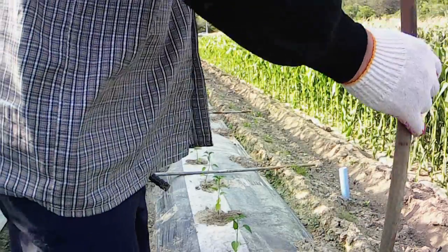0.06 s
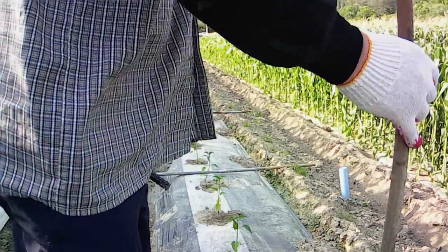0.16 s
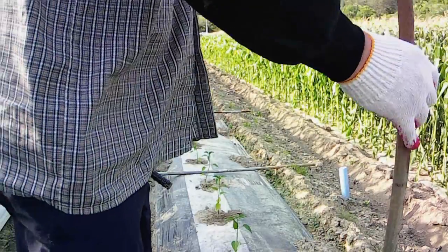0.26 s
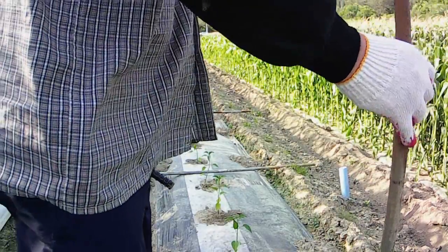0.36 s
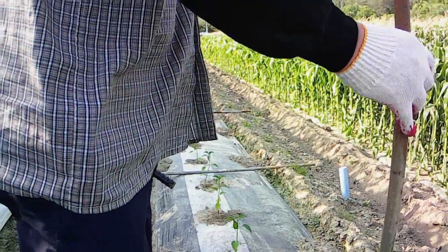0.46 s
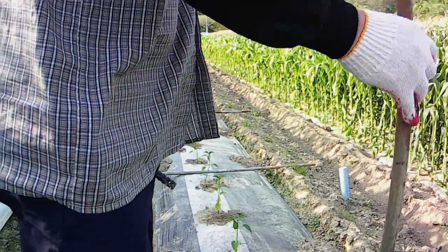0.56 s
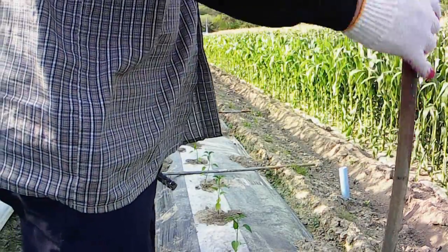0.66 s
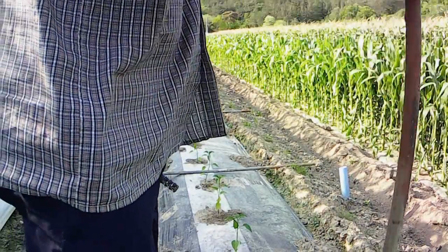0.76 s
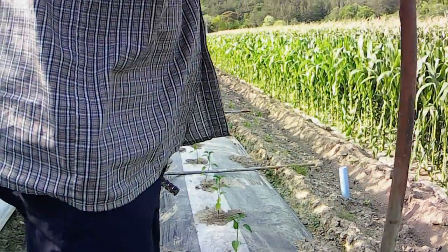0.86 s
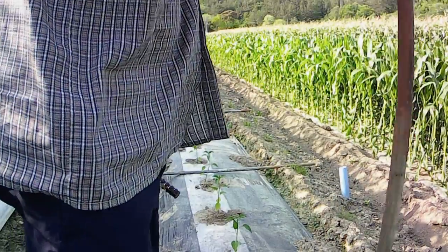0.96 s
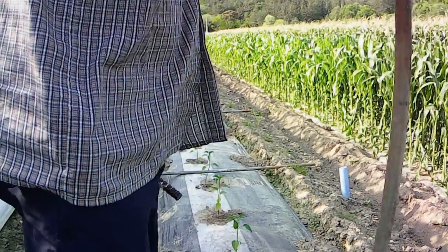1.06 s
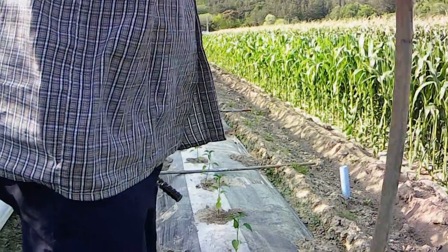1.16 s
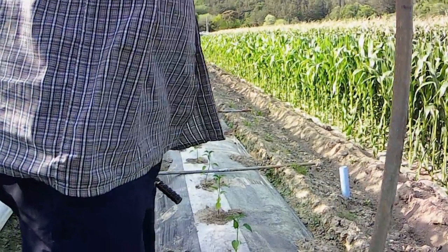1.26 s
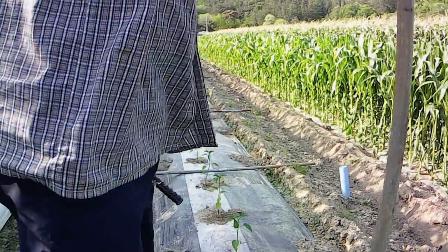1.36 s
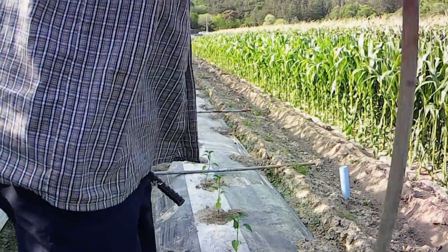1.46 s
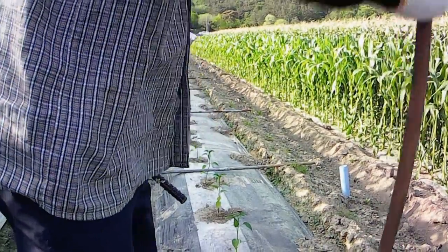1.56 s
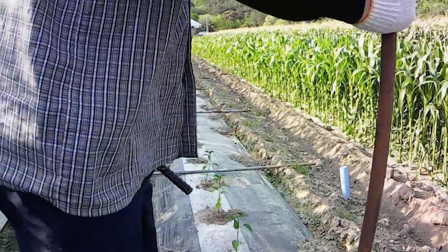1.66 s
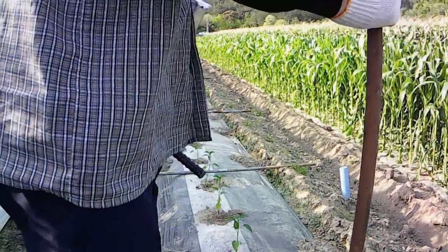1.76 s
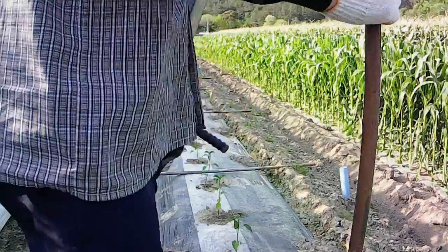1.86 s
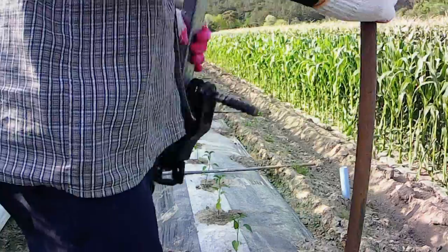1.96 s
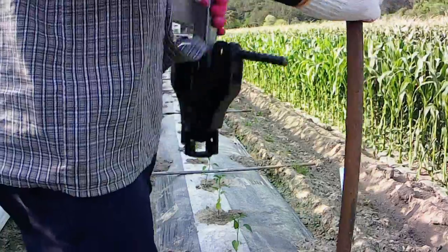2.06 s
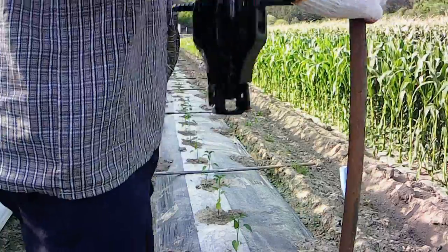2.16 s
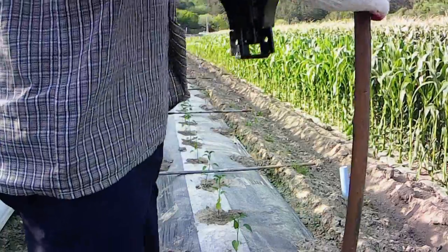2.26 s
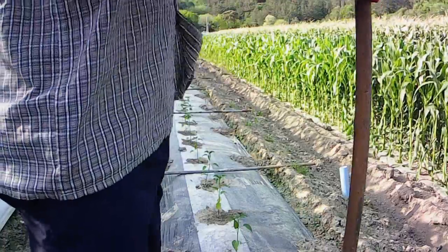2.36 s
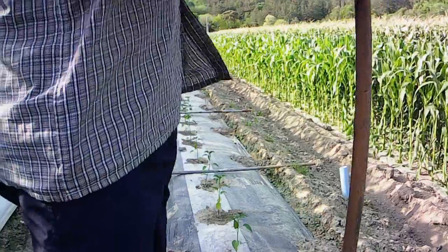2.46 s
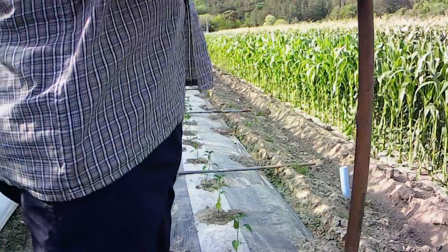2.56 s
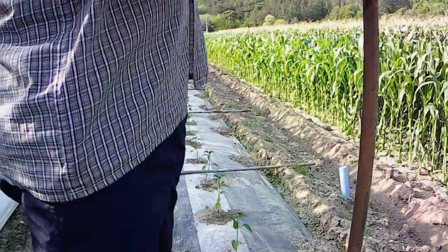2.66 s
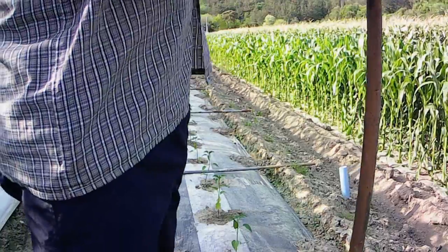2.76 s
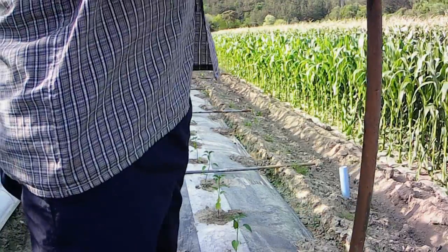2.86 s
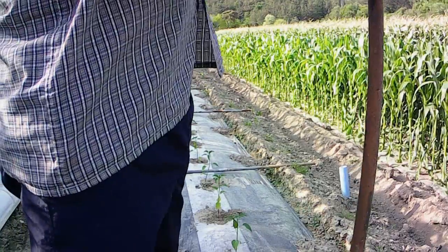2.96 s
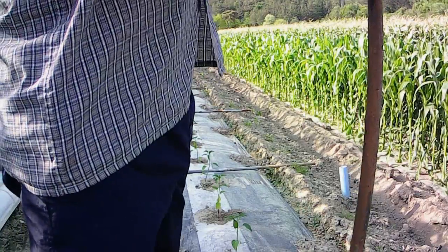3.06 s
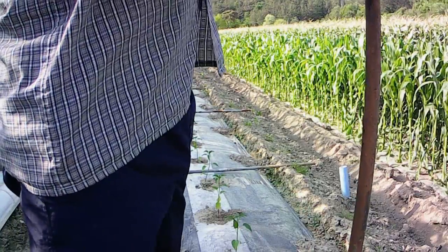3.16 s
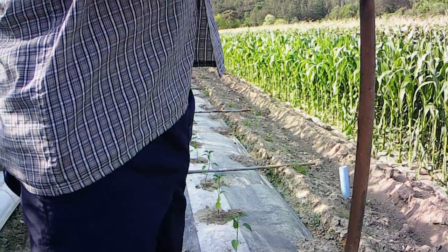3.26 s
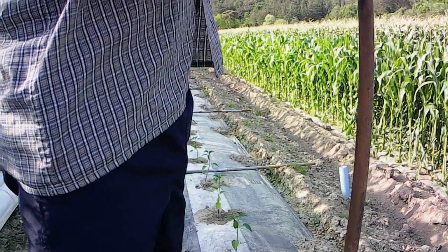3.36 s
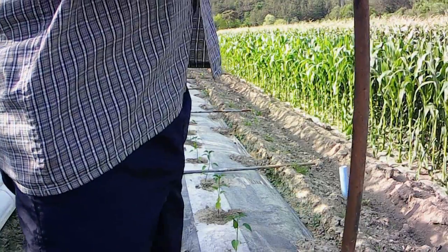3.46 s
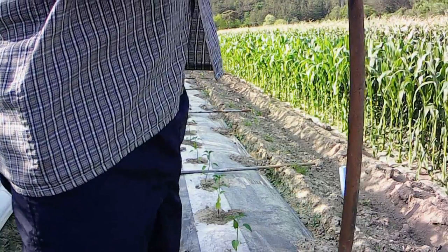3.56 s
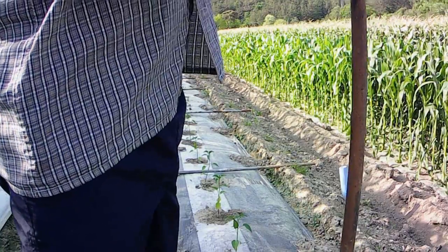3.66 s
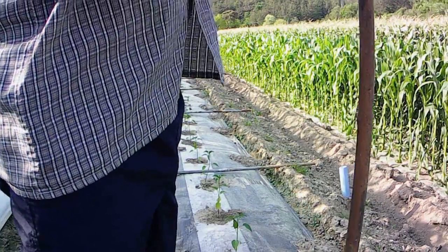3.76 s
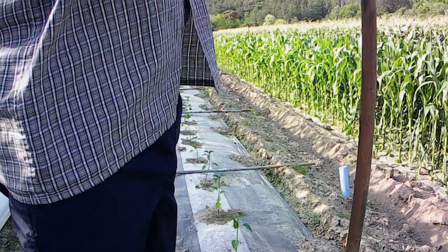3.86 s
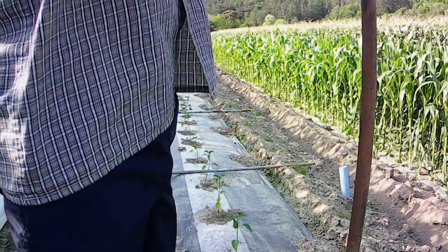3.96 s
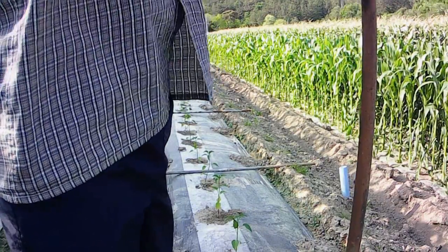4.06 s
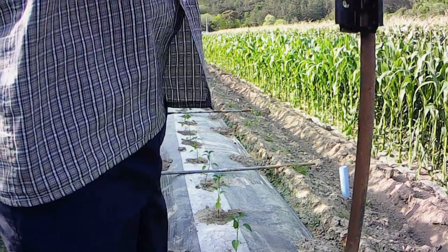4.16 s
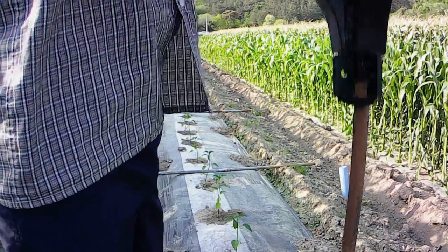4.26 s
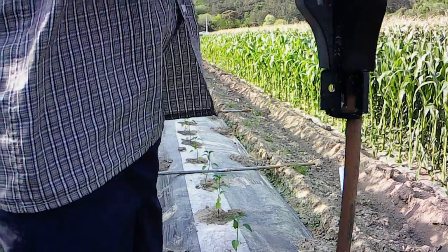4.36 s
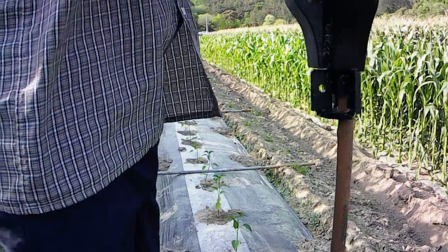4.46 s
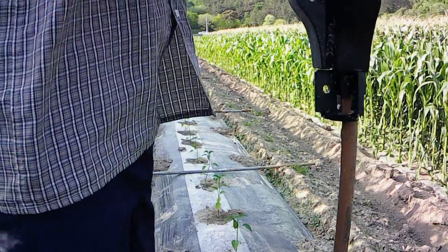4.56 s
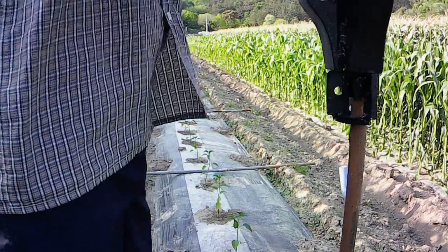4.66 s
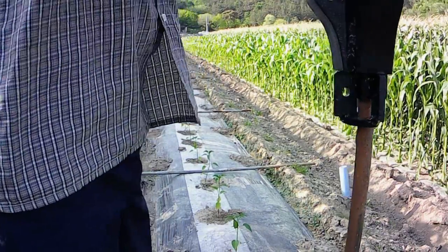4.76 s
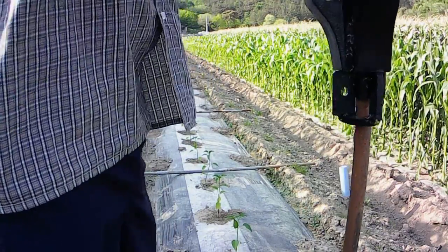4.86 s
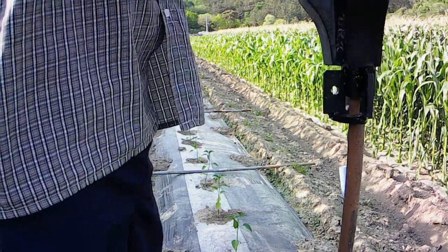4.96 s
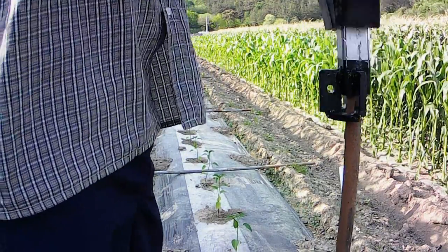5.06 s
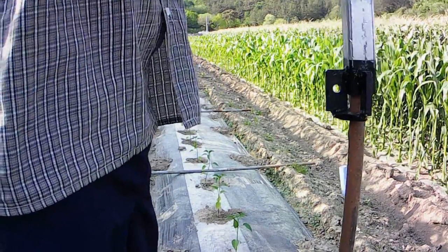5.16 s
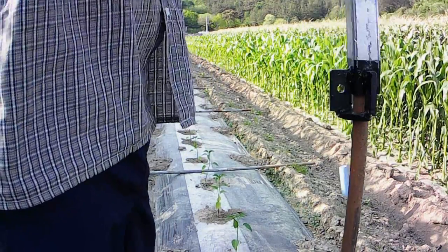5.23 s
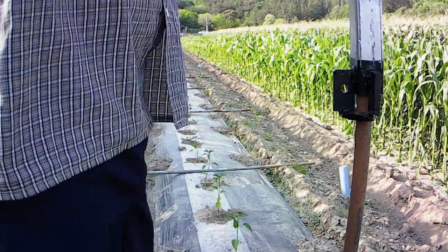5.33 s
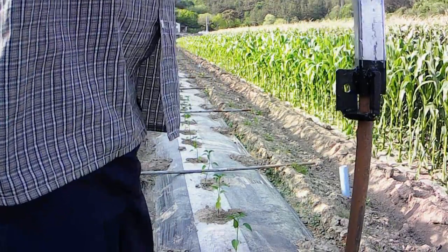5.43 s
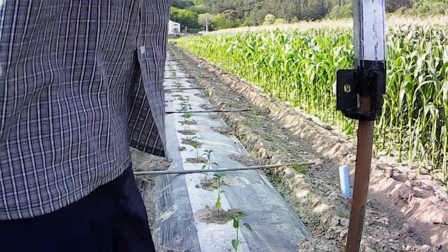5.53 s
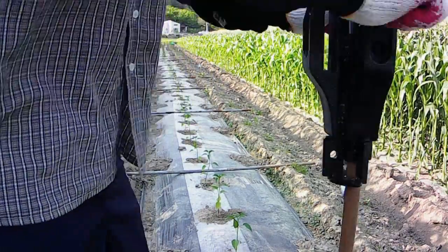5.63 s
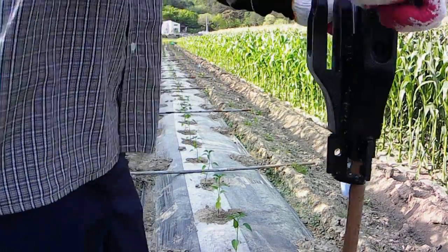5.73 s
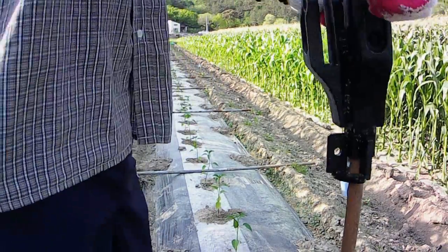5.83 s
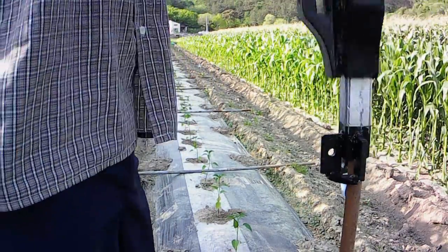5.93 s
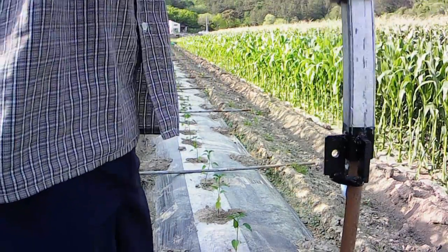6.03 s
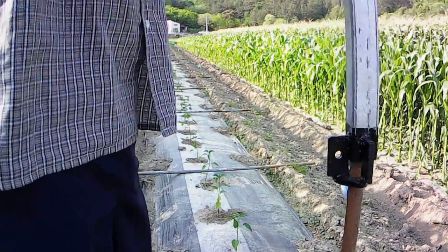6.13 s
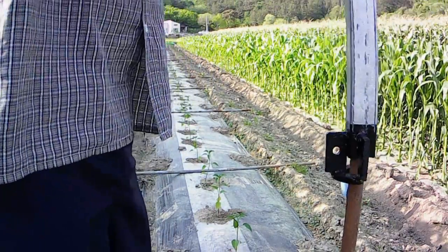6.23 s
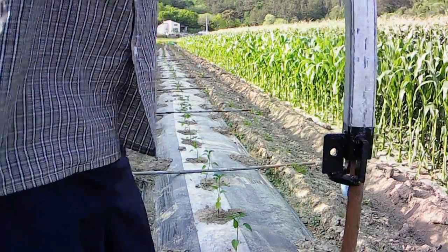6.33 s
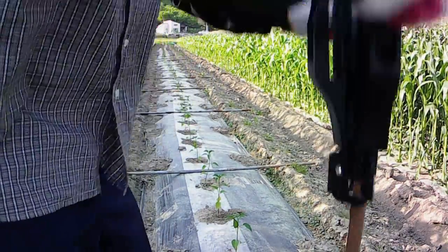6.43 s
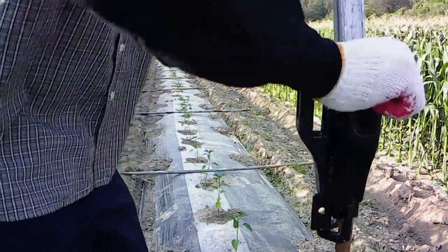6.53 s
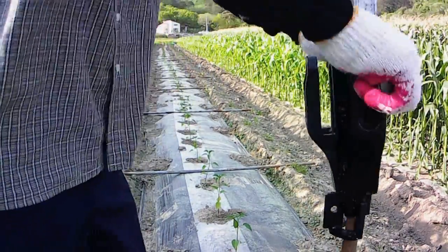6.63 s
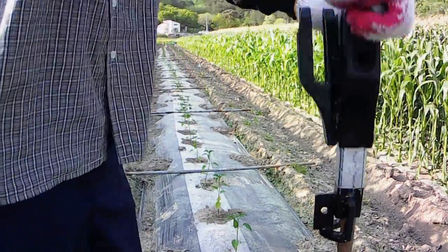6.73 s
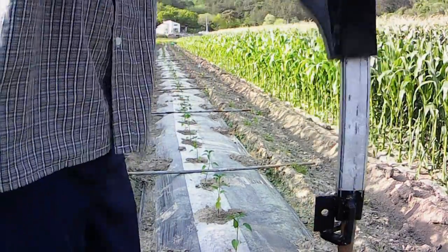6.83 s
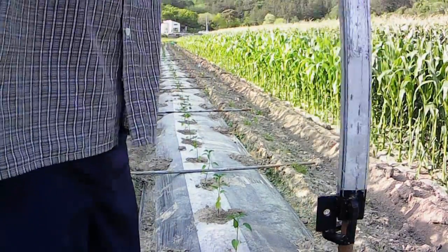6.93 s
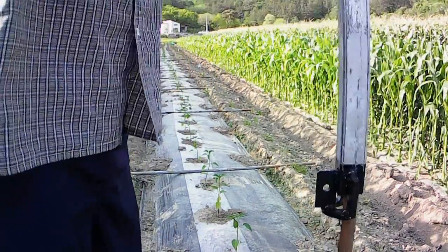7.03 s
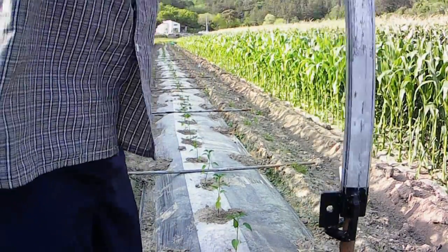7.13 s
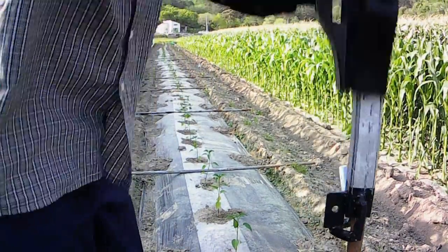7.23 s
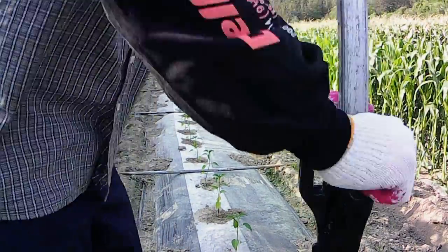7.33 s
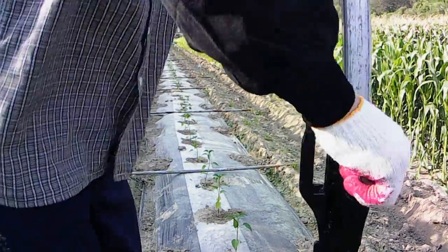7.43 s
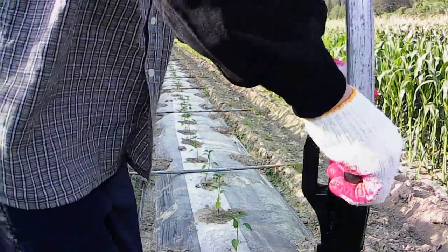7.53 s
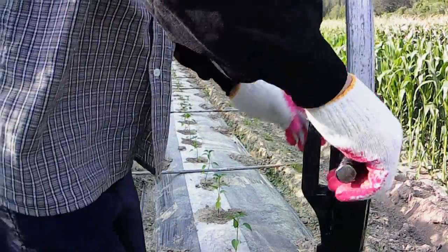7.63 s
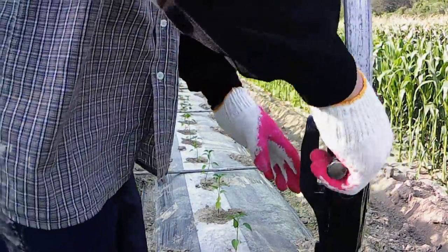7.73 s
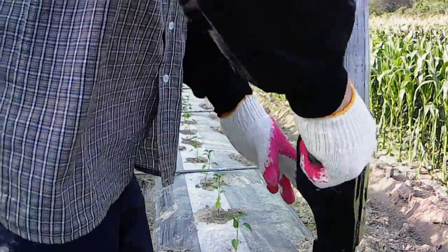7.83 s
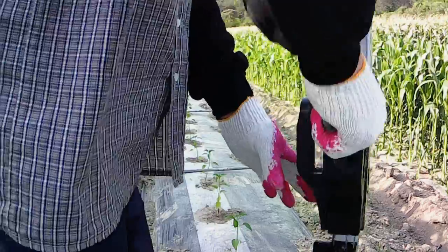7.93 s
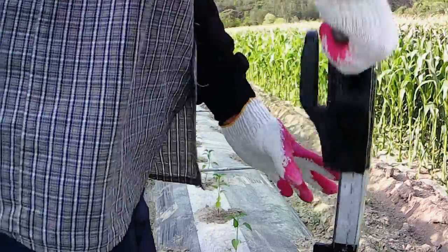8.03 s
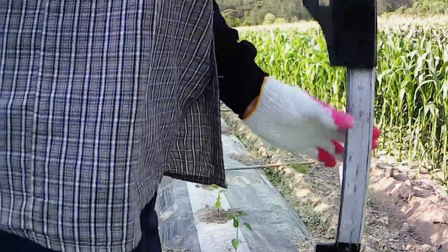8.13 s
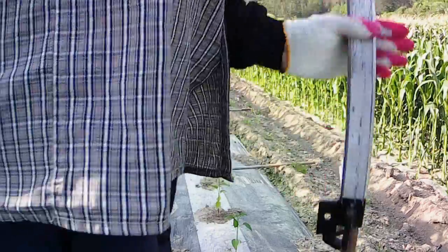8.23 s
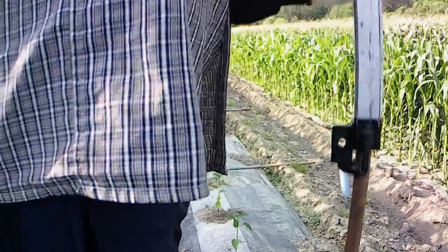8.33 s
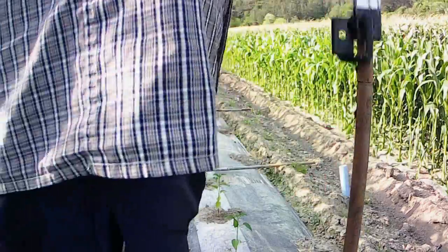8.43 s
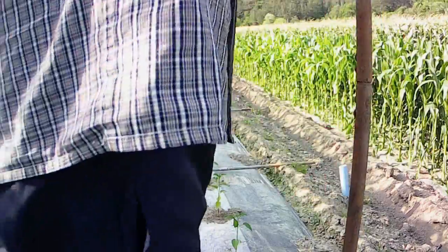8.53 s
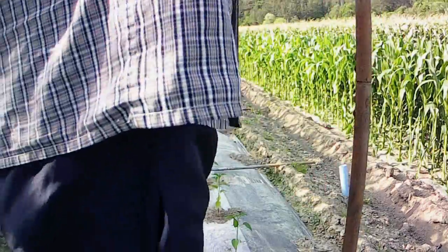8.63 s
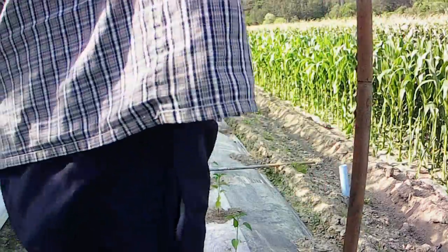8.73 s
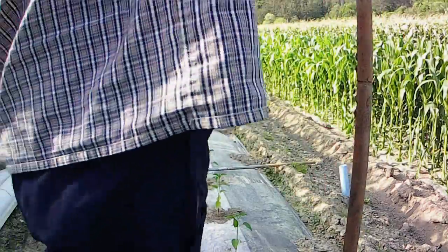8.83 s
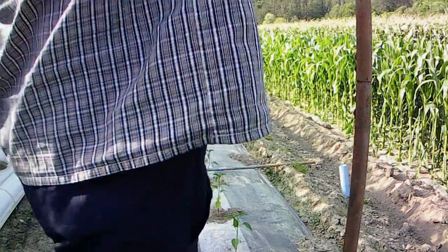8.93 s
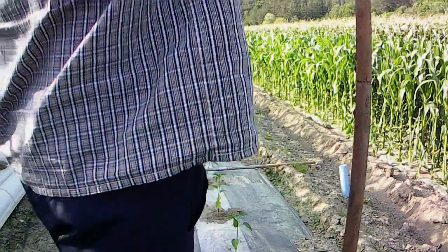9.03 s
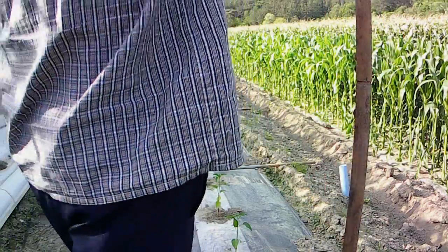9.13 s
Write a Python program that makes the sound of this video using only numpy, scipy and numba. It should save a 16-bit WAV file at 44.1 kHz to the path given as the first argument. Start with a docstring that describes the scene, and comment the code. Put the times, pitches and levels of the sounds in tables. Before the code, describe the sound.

A heavy steel sliding hammer clatters onto a pipe outdoors, slams three times with harsh overloaded clanks, then scrapes loose and stops.

```python
"""Quiet open air throughout; first two dull bumps on soil, with small ticks and cloth rustle.
From 2.7 s a steel slide hammer on a square guide tube, set over a pipe in a field, knocks and scrapes close by:
random contact forces ring the modes of tube and hammer, with clatter of loose parts as filtered noise.
Three slams, at 5.6, 6.5 and 7.3 s, overload the converter, with a low noise burst under each.
Knocks and scraping then thin out until 8.8 s, leaving the air and a low wind, both shaped noise."""
import sys
import numpy as np
from scipy import signal
from scipy.fft import rfft, irfft
from scipy.io import wavfile
from scipy.ndimage import uniform_filter1d
from numba import njit

SR = 44100
rng = np.random.default_rng(int(sys.argv[2]) if len(sys.argv) > 2 else 0)


def wav_out(sig):
    """Save sig, one row per channel (or a flat mono array), as 16-bit PCM at SR to the path in sys.argv[1]."""
    wavfile.write(sys.argv[1], SR, np.round(np.clip(np.atleast_2d(sig).T, -1, 1) * 32767).astype(np.int16))


N = 405279

# Low wind on the microphone. Each row: time in seconds, level in dB.
WIND_LEVEL = [(0.0, -74), (1.43, -79), (1.64, -77.5), (2.71, -81), (4.1, -93.5), (6.0, -81), (7.63, -84),
              (9.19, -96.5)]
# Wind spectrum. Each row: frequency in Hz, relative density in dB per Hz.
WIND_SPECTRUM = [(15, -8.5), (80, -3.0), (130, -4.5), (300, -41.5)]
# Open air before gain and flutter. Each row: time in seconds, level in dB.
AIR_LEVEL = [(0.0, -72), (1.1, -72.5), (3.4, -73.5), (6.0, -70.5), (9.19, -71.5)]
# Open air spectrum. Each row: frequency in Hz, relative density in dB per Hz.
AIR_SPECTRUM = [(12, -42.5), (20, -40), (80, -9.5), (115, -18), (155, 3), (263, 2), (409, 3.5), (445, 4),
                (865, 1.5), (3550, -24), (10200, -14.5), (12000, -18), (15000, -74.5)]
# Rustle of cloth. Each row: time in seconds, level in dB.
CLOTH_LEVEL = [(0.0, -66.5), (0.65, -68.5), (0.85, -56.5), (1.18, -67.5), (1.46, -66.5), (1.74, -61),
               (2.1, -65), (2.33, -70), (3.3, -74)]
# Cloth spectrum. Each row: frequency in Hz, relative density in dB per Hz.
CLOTH_SPECTRUM = [(180, -48), (300, -7), (529, -7), (749, 6), (1080, -1.5), (1550, -1.5), (3920, -11),
                  (7850, -23), (12000, -25.5), (13000, -23)]
# Bumps on soil. Each row: start in seconds, crunch level in dB, crunch decay in seconds,
# rise constant in seconds, thud level in dB.
SOIL_BUMPS = [(0.776, -43, 0.18, 0.047, -41.5), (1.587, -23.5, 0.099, 0.0013, -37)]
# Crunch spectrum. Each row: frequency in Hz, relative density in dB per Hz.
SOIL_SPECTRUM = [(47, -84), (80, -10.5), (232, -3), (673, -0.5), (851, 6), (1300, 4), (1910, -2.5),
                 (3700, -10), (13000, -42)]
# Small dry ticks. Each row: start in seconds, level in dB, frequency in Hz.
DRY_TICKS = [(0.775, -39, 1690), (0.989, -47.5, 1560), (1.217, -49, 1450), (1.384, -51, 1530),
             (1.454, -50, 1570), (1.48, -46.5, 1640), (1.591, -33, 834), (1.691, -48, 1520),
             (1.745, -62, 802), (1.85, -50, 2370), (1.875, -51, 1620), (1.902, -58, 1680),
             (2.186, -46.5, 885), (2.505, -52, 950)]
# Scraping of the slide. Each row: time in seconds, drive level in dB.
SLIDE_LEVEL = [(3.3, -75), (3.45, -67), (3.87, -52), (4.1, -55), (4.3, -52.5), (4.41, -43.5), (4.69, -74.5),
               (4.94, -68.5), (5.25, -51.5), (5.7, -73), (5.85, -46.5), (6.22, -58), (6.3, -38.5),
               (6.53, -46), (6.72, -49), (7.0, -43.5), (7.24, -34), (7.5, -62.5), (7.89, -66),
               (8.05, -52.5), (8.23, -40), (8.37, -30.5), (8.45, -57.5), (8.73, -64), (8.85, -75)]
# Spectra of the scrape and of its rumble. Each row: frequency in Hz, relative gain in dB.
SCRAPE_SPECTRUM = [(100, -18.5), (700, -3.5), (1100, 0), (1900, -4.0), (4800, 0), (7000, -7), (12000, -34.0)]
RUMBLE_SPECTRUM = [(50, -39.5), (160, -4.0), (450, 1.5), (1200, -21), (4000, -47)]
# Modes of the square tube. Each row: frequency in Hz, relative gain in dB, unscaled 60 dB decay in seconds.
TUBE_MODES = [(738, -4, .3), (1077, -11, .3), (1272, -9, .5), (1610, -11, .4), (1815, -8, .12),
              (1900, -4, .5), (1955, -7, .15), (2105, -13, .5), (2627, -12, .65), (2975, -5, .2),
              (3485, -13, .25), (3590, -10, .22), (4045, -12, .25), (4430, -13, .18), (4760, -15, .2),
              (5310, -14, .33), (5685, -19, .2), (6350, -18, .18), (6465, -14, .35), (7160, -17, .25),
              (7680, -20, .33)]
# Modes of the hammer. Each row: frequency in Hz, relative gain in dB, unscaled 60 dB decay in seconds.
HAMMER_MODES = [(985, -17, .85), (1470, -11, .08), (2210, -11, .1), (2530, -15, .14), (2760, -4, .2),
                (2945, -8, .17), (3195, -4, .1), (3235, -9, .2), (3670, -14, .13), (3960, -6, .16),
                (4108, -6, .21), (4255, -12, .14), (4515, -9, .11), (5120, -16, .12), (5900, -16, .2),
                (6014, -17, .75), (6190, -17, .2), (6787, -14, .17), (8190, -21, .24), (8550, -24, .2),
                (9120, -23, .17)]
# Countless weak modes. Each row: frequency in Hz, relative density in dB per Hz.
CLATTER_SPECTRUM = [(35, -77.5), (60, -57), (524, -14), (738, -4), (1720, -7), (1920, -5.5), (2470, -15),
                    (2710, -13), (4080, -5), (6300, -23), (14000, -99)]
# Steel on steel. Each row: start in seconds, level in dB, bass in dB, treble in dB, favoured low mode in Hz,
# favoured high mode in Hz, tube over hammer in dB, place struck from 0 to 1, contact in seconds.
STEEL_KNOCKS = [(2.693, -39.5, -44, -5, 2945, 4170, -4, 0.58, .01),
                (3.366, -32.5, -19, -16, 1960, 3280, -2.5, 0.37, 0.0024),
                (3.41, -42.5, -12, -38, 1630, 3015, 1, 0, 0.0013),
                (3.525, -46.5, -8, -40, 1610, 3960, 3, .3, 0.0094),
                (3.62, -53, 0, -44, 1620, 3160, -4, .2, 0.0009),
                (3.695, -27.5, -17, -9.5, 820, 3160, -2.5, 0.11, 0.0033),
                (3.746, -39.5, 13, -19, 1990, 3320, -1.7, .39, 0.0033),
                (3.888, -31.5, -3.5, -18, 1992, 3070, 13.5, .05, 0.0041),
                (3.952, -26.5, -5, -29, 1580, 3370, -1, .39, .004),
                (3.972, -33, -4, -7, 1200, 3370, -8, 0.1, 0.015),
                (4.051, -39.5, -2, -27, 800, 2500, -7.5, 0.1, .004),
                (4.215, -51.5, -23, -35, 1900, 3056, 19, 0.24, 0.029),
                (4.262, -35.5, 6.5, -31, 730, 3230, -11.5, 0.35, 0.0024),
                (4.304, -34, 6, -7, 1970, 3200, 6, .08, .001),
                (4.332, -11, -7, -15, 1450, 2210, -2, 0.28, 0.013),
                (4.469, -29, -5, -56, 2020, 3260, 7, 0.17, .001),
                (4.498, -33.5, -4.5, -14, 1249, 2760, 2, .3, 0.011),
                (4.57, -38.5, -10, -24, 2000, 2770, 8, 1, .001),
                (4.669, -48.5, 3, -39, 1815, 3040, 3, .2, .001),
                (4.719, -43.5, 8, -17, 680, 3110, -1.5, .38, .001),
                (4.912, -41, 5.5, -16, 1246, 3330, -9, .3, 0.0012),
                (4.953, -48.5, 13.5, -38, 705, 3110, 6, .3, 0.0011),
                (5.049, -46, -9.5, 2, 1900, 2950, -0.5, 1, .001),
                (5.08, -31, -20.5, -13, 1710, 2700, 9.5, .57, 0.00072),
                (5.103, -36, -6.5, -6, 1970, 2760, 5, .37, 0.015),
                (5.262, -41, -10.5, 3, 1820, 4460, 7.5, .4, 0.00093),
                (5.278, -33.5, -23.5, -10, 1930, 4260, 5, 0, 0.0016),
                (5.396, -29, -14, -14.5, 738, 2886, 22, 0.37, 0.014),
                (5.496, -40, -7, -5, 1905, 2720, -3.5, .23, 0.0014),
                (5.602, -26.5, -4.5, -7, 1220, 4460, 3.5, .36, 0.0055),
                (5.61, -20, -29, -1, 1280, 2760, -10, 0.74, .003),
                (5.631, 7.5, -4.5, 3, 1816, 3193, -3, 0.25, 0.0083),
                (5.809, -36.5, -3.5, -43, 1360, 3430, -3, .3, 0.008),
                (5.822, -31, -1, -17.5, 1260, 2850, -25, 1, 0.00084),
                (5.852, -16, -8, -14.5, 1047, 6200, 14, 0.31, 0.0049),
                (5.98, -32.5, 11.5, 2, 1108, 2630, 0, .3, 0.003),
                (6.076, -34.5, -27.5, -15.5, 1584, 3245, 3, 0.7, .001),
                (6.11, -37, -30, -6.5, 1250, 4110, 23, 0.4, 0.0007),
                (6.14, -35.5, 3.5, -12, 1805, 4390, 9.5, .3, 0.0014),
                (6.255, -25, -5, 5.5, 1760, 3673, 14, .39, .001),
                (6.326, -25, -11, -12, 1871, 5340, -1.5, .87, 0.0091),
                (6.364, -24, -23.5, -14.5, 740, 3170, 10, .51, .001),
                (6.406, -26.5, -6, -21, 738, 4100, 4, 0.56, 0.012),
                (6.458, -14, -4, 7, 1268, 2700, -7, .39, 0.0017),
                (6.492, 8.5, -9, 4, 2210, 4080, -3.5, .29, 0.013),
                (6.562, -22.5, -20, -0.5, 1100, 2680, -13.5, 0.84, 0.0052),
                (6.671, -34, -7, -4, 1270, 4010, -2, .35, .008),
                (6.687, -14.5, -7.5, -2.5, 2010, 6633, 8.5, 0.1, 0.0038),
                (6.788, -26, 11, -3, 1365, 6594, 8.5, .3, 0.0015),
                (6.851, -32, -0.5, -15.5, 1270, 3070, -12, 0.99, 0.014),
                (7.005, -24, -11, 8, 1270, 3190, -3, 0.07, 0.0066),
                (7.019, -3, -24.5, -2.5, 738, 4440, 5.5, 0.39, 0.00086),
                (7.092, -19.5, -10.5, 0, 738, 3270, -2, .9, .001),
                (7.142, -25.5, -21, -4, 735, 3200, 2.5, 0.4, .001),
                (7.202, -21.5, -18, -1, 1245, 4046, 13, .47, 0.015),
                (7.243, -20, -15.5, -15, 759, 4000, -15, 0, 0.0079),
                (7.296, -8, -15.5, -2, 1996, 2756, -15, .45, .001),
                (7.330, 9, -19, -6.5, 985, 5843, -12, 0.22, 0.014),
                (7.432, -27.5, -2, -12, 2026, 4060, -5, 0.33, .006),
                (7.58, -44, 9, -28.5, 973, 2900, -0.5, 0.32, 0.0016),
                (7.619, -49.5, 14, -33, 755, 2990, -10, 0.33, 0.0012),
                (7.819, -39.5, -6, -40, 1263, 2873, -5, .87, 0.004),
                (7.903, -26.5, -10, -12.5, 1845, 2760, -6, 0.49, 0.047),
                (7.923, -16.5, -22, -34, 1826, 2560, 1, 0.33, .001),
                (7.988, -41, -8, -27, 1935, 3620, -9.5, 0.47, 0.092),
                (8.114, -37.5, 0.5, -11.5, 1307, 3480, 4, 0.35, 0.0007),
                (8.158, -29, -3, -14, 1210, 2780, 12.5, 0.52, 0.0019),
                (8.241, -7.5, -7, -6, 1978, 4201, -3, 0, 0.0064),
                (8.261, -20.5, -9, -2.5, 738, 1852, 4, .24, 0.066),
                (8.464, -32.5, 3.5, -3, 1968, 4780, -1.5, .73, .001),
                (8.498, -44.5, 6, -30, 738, 3740, -1, 0.48, 0.00085),
                (8.542, -51.5, 1, -31, 1967, 3680, 5.5, 0.12, 0.00097),
                (8.608, -36.5, -2, -14, 1965, 3060, 1, 0.16, 0.0067),
                (8.70, -49.5, -3, -7, 743, 3990, 6.5, 0.5, 0.032),
                (8.719, -46, -12, -30, 732, 2936, 8, .63, .001)]
# Low burst of the overload. Each row: frequency in Hz, relative density in dB per Hz.
OVERLOAD_SPECTRUM = [(20, 4.0), (45, -2.5), (90, -15.0), (250, 1.0), (600, -15.0), (2000, -69)]

PATCHY_DB = 4  # spread of the rubbing from patch to patch, before smoothing
RATTLE_PER_S, RATTLE_DB = 19, -4  # mean rate and level of loose ticks under the slide's level curve
RUMBLE_DB = -17
ROUGH_DB = 3.0  # rebound trim, above -20 dB
CLATTER_S, CLATTER_PER_CONTACT, CLATTER_PER_DB = 0.066, 0.19, 0.4  # rebounds last longer after long or hard contact
LOW_DB, LOW_PER_BASS = 1.5, .4  # low middle leans with the bass
RING_DB, SLAM_DB, DAMP_PER_DB = -4, 4.5, 1.76  # decay times in dB; blows over SLAM_DB press the parts still
HISS_DB, CROWD_DB = -17, 9  # noise and weak modes under the ring
BURST_S = .18  # 60 dB decay
TOP_HZ = 15600


def undb(db):
    """Amplitude ratio of a level in dB."""
    return 10 ** (np.asarray(db, float) / 20)


def seconds(length_s):
    """Sample times from zero."""
    return np.arange(int(length_s * SR)) / SR


def decay(t, t60_s):
    """Exponential fall of 60 dB in t60_s."""
    return undb(-60 * t / t60_s)


def log_interp(hz, table):
    """Read a (Hz, dB) table along log frequency."""
    table_hz, table_db = np.array(table).T
    return np.interp(np.log(hz), np.log(table_hz), table_db)


def colour(x, *tables, size=2048):
    """Causal minimum-phase filter from summed (Hz, dB) tables; white noise of rms 1 keeps rms 1."""
    grid_hz = np.linspace(1, SR / 2, size // 2 + 1)
    db = sum(log_interp(grid_hz, table) for table in tables)
    cepstrum = irfft(db * np.log(10) / 20)
    # fold to positive time
    cepstrum[1:size // 2] *= 2
    cepstrum[size // 2 + 1:] = 0
    taps = irfft(np.exp(rfft(cepstrum)))
    taps = taps / np.sqrt(np.sum(taps ** 2))
    return signal.fftconvolve(x, taps)[:len(x)]


def curve(table, quiet_db=-120):
    """Interpolate a (s, dB) table over the scene; quiet_db outside it."""
    table_s, table_db = np.array(table).T
    return np.interp(np.arange(N) / SR, table_s, table_db, quiet_db, quiet_db)


def add(out, x, start_s):
    """Mix x into out at start_s, cut at the end."""
    i = int(start_s * SR)
    out[i:i + len(x)] += x[:len(out) - i]


def patches(length):
    """Normal random values, each held for length samples."""
    return np.repeat(rng.standard_normal(N // length + 1), length)[:N]


def grit(n, rate_per_s, spread_db):
    """Random contacts, mostly small, now and then large; rms 1."""
    hits = rng.random(n) < rate_per_s / SR
    sizes = undb(spread_db * rng.exponential(size=n))
    x = hits * sizes * rng.choice([-1, 1], n)
    return x / np.sqrt(np.mean(x ** 2))


@njit
def ring(force, hz, gain, t60_s):
    """Decaying modes driven by force, each run until it has died away."""
    y = np.zeros(len(force))
    last = np.nonzero(np.abs(force) > 1e-4 * np.abs(force).max())[0][-1]
    for f, g, t in zip(hz, gain, t60_s):
        pole = np.exp(2j * np.pi * f / SR - np.log(1000) / (t * SR))
        z = 0j
        for i in range(min(len(force), last + int(1.2 * t * SR))):
            z = z * pole + force[i] + 1e-18
            y[i] += g * z.imag
    return y


def low_wind():
    """Low turbulence on the microphone: noise mostly under 130 Hz."""
    noise = colour(rng.standard_normal(N), WIND_SPECTRUM, size=16384)
    return noise * undb(curve(WIND_LEVEL))


def open_air():
    """Soft hiss: shaped noise with a gently wavering level."""
    flutter_db = 12 * uniform_filter1d(uniform_filter1d(patches(100), 3000), 3000)
    level_db = curve(AIR_LEVEL) + 2.5 + flutter_db
    return colour(rng.standard_normal(N), AIR_SPECTRUM, size=16384) * undb(level_db)


def cloth_rustle():
    """Many small random contacts of fibres, filtered."""
    return colour(grit(N, 8700, 2.7), CLOTH_SPECTRUM) * undb(curve(CLOTH_LEVEL))


def soil_bumps():
    """Grains crunch as filtered contacts; a decaying 175 Hz thud follows."""
    out = np.zeros(N)
    t = seconds(.3)
    for start_s, level_db, crunch_s, rise_s, thud_db in SOIL_BUMPS:
        shape = (1 - np.exp(-t / rise_s)) * decay(t, crunch_s)
        crunch = colour(shape / shape.max() * grit(len(t), 9100, 0.75), SOIL_SPECTRUM)
        thud = np.sin(2 * np.pi * 175 * t) * (1 - np.exp(-t / 0.014)) * decay(t, 0.23)
        add(out, undb(level_db) * crunch, start_s)
        add(out, undb(thud_db) * thud, start_s + 0.0213)
    return out


def dry_ticks():
    """Each tick is one short decaying sine."""
    out = np.zeros(N)
    t = seconds(.3)
    for start_s, level_db, hz in DRY_TICKS:
        add(out, undb(level_db) * np.sin(2 * np.pi * hz * t) * decay(t, 0.017), start_s)
    return out


def crowd(t60_s=0.069, count=140):
    """Impulse response of the many weak modes of welded steel, scattered at random; unit energy."""
    t = seconds(.2)
    place, phase, hold = rng.random((count, 3)).T[:, :, None]
    modes = np.sin(2 * np.pi * ((250 + 9500 * place) * t + phase))
    response = np.sum(modes * decay(t, t60_s * (0.7 + 0.43 * hold)), axis=0)
    return response / np.sqrt(np.sum(response ** 2))


def slide_scrape(weak_modes):
    """Patchy stick-slip rubbing and loose ticks keep both parts humming over a rasp and a handling rumble."""
    patch_db = PATCHY_DB * uniform_filter1d(patches(800), 250)
    rubbing = grit(N, 2300, 0.64) * undb(patch_db)
    rattle = undb(RATTLE_DB) * grit(N, RATTLE_PER_S, 0.78)
    force = (rubbing + rattle) * undb(curve(SLIDE_LEVEL))
    hz, db, t60_s = np.transpose(TUBE_MODES + HAMMER_MODES)
    hum = ring(force, hz, undb(db - 38.5), .5 * t60_s)
    rasp = colour(signal.fftconvolve(force, weak_modes)[:N] + 0.13 * force, CLATTER_SPECTRUM)
    scrape = colour(hum + undb(-17.5) * rasp, SCRAPE_SPECTRUM)
    rumble = colour(force, RUMBLE_SPECTRUM, size=4096)
    return scrape + undb(RUMBLE_DB) * rumble


def overload_burst():
    """Slams that overload the converter add a burst of low noise; below 0 dB it falls 3 dB per dB of blow."""
    envelope = np.zeros(N)
    t = seconds(.2)
    for start_s, level_db, *_ in STEEL_KNOCKS:
        add(envelope, undb(3 * min(level_db, 0) - 29.5) * decay(t, BURST_S), start_s)
    return colour(envelope * rng.standard_normal(N), OVERLOAD_SPECTRUM, size=8192)


def knock(weak_modes, level_db, bass_db, treble_db, low_hz, high_hz, tube_db, place, contact_s):
    """One blow and its rebounds ring both parts over a burst of clatter; peak near 1."""
    t = seconds(.3)
    clatter_s = CLATTER_S * undb(CLATTER_PER_DB * level_db) + CLATTER_PER_CONTACT * contact_s
    clatter_s = max(clatter_s, .005)
    fade = (1 - np.exp(-t / 0.00034)) * decay(np.maximum(t - contact_s, 0), clatter_s)
    # first tap, then a shower of rebounds
    force = undb(ROUGH_DB - 20) * fade * grit(len(t), 2500, 2.47)
    force[0] = 0.98

    hz, db, t60_s = np.transpose(TUBE_MODES + HAMMER_MODES)
    is_tube = np.arange(len(hz)) < len(TUBE_MODES)
    # where the hammer takes most of the blow it also clamps the tube and stills it
    clamp_db = 0.87 * is_tube * min(tube_db, 0)
    press_db = DAMP_PER_DB * max(level_db - SLAM_DB, 0)
    t60_s = t60_s * undb(RING_DB - press_db + clamp_db)

    tilt = [(60, bass_db - 25), (150, bass_db - 9), (900, bass_db), (1950, LOW_DB + LOW_PER_BASS * bass_db),
            (3300, 0.0079), (6500, treble_db), (11000, treble_db - 11.5)]
    db = db + np.where(is_tube, tube_db, -tube_db) / 2 + log_interp(hz, tilt)
    # bending waves shorten with the root of frequency, so the place struck favours some modes, two above all
    shape = 0.02 + np.cos(2 * np.pi * place * np.sqrt(hz / 100)) ** 2
    favoured = sum(np.exp(-(np.log(hz / f) / 0.024) ** 2) for f in (low_hz, high_hz))
    gain = undb(db - 15.0) * (shape + 4.62 * favoured) * rng.choice([-1, 1], len(hz))
    out = ring(np.pad(force, (0, 2 * len(t))), hz, gain, t60_s)

    hiss = (undb(HISS_DB) * fade + undb(-3.5) * decay(t, 0.0083)) * rng.standard_normal(len(t))
    rattle = undb(CROWD_DB) * signal.fftconvolve(force, weak_modes)[:len(t)]
    add(out, colour(hiss + rattle, CLATTER_SPECTRUM, tilt), 0)
    return out


def knocks(weak_modes):
    """All knocks and slams of steel on steel, each at its level."""
    out = np.zeros(N)
    for start_s, level_db, *how in STEEL_KNOCKS:
        add(out, undb(level_db) * knock(weak_modes, level_db, *how), start_s)
    return out


def scene():
    """Sum of all sources; slide and knocks share the weak modes."""
    weak_modes = crowd()
    background = low_wind() + open_air() + cloth_rustle() + soil_bumps() + dry_ticks()
    steel = slide_scrape(weak_modes) + overload_burst() + knocks(weak_modes)
    return (background + steel)[None]


def record(dry):
    """The converter clips the slams flat; the top is softened, then cut."""
    flat = np.clip(dry, -.9, .92)
    soft = signal.sosfilt(signal.butter(2, 13000, fs=SR, output="sos"), flat)
    cut = signal.sosfilt(signal.ellip(8, .2, 50, TOP_HZ, fs=SR, output="sos"), soft)
    return np.clip(cut, -1, 1)


dry = scene()
out = record(dry)
wav_out(out)
```